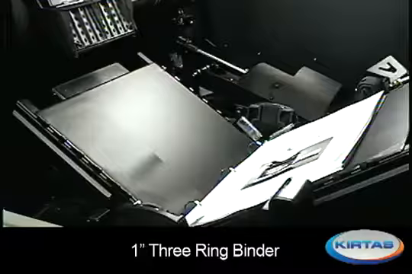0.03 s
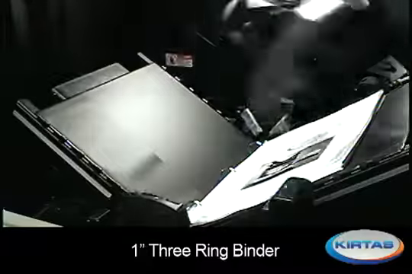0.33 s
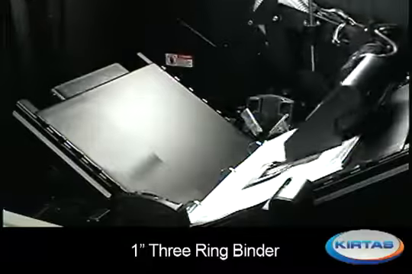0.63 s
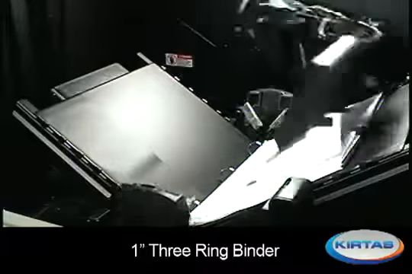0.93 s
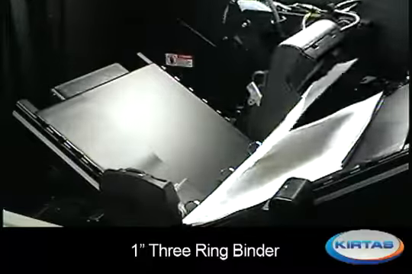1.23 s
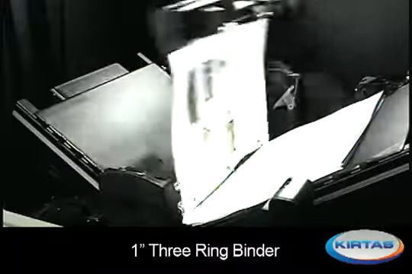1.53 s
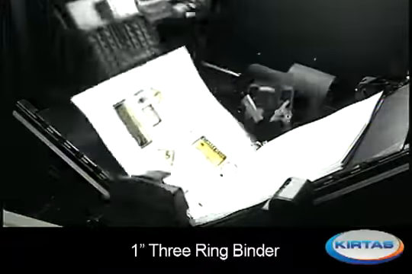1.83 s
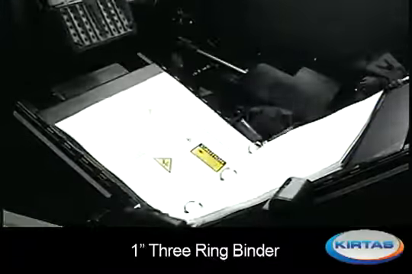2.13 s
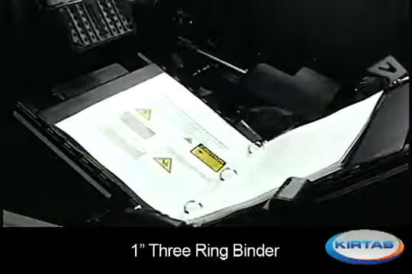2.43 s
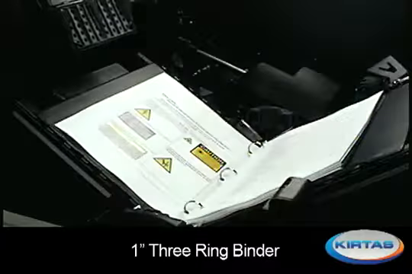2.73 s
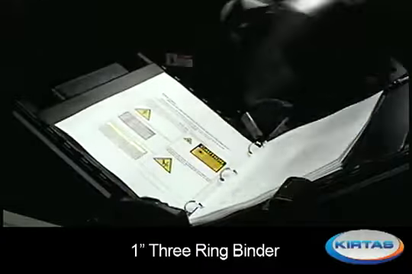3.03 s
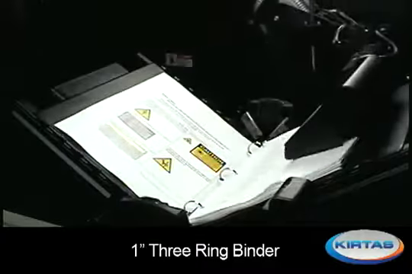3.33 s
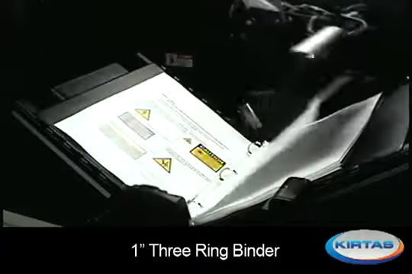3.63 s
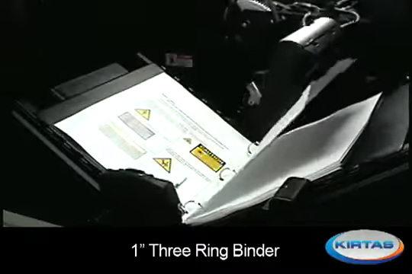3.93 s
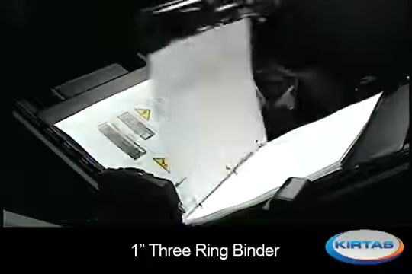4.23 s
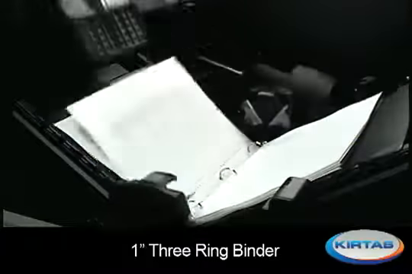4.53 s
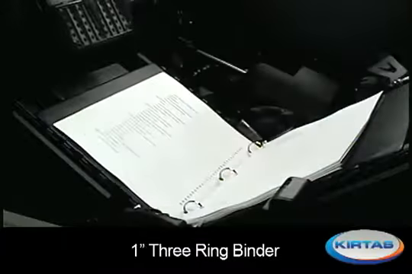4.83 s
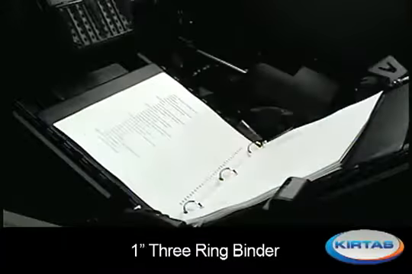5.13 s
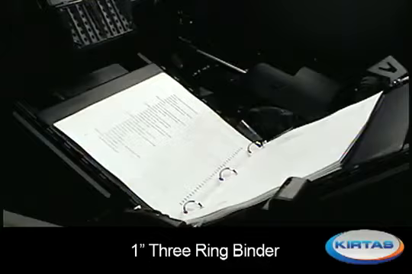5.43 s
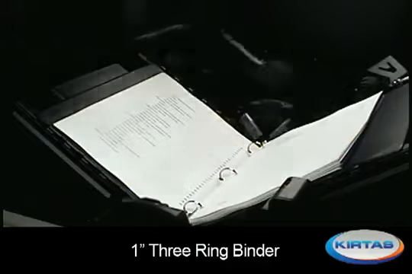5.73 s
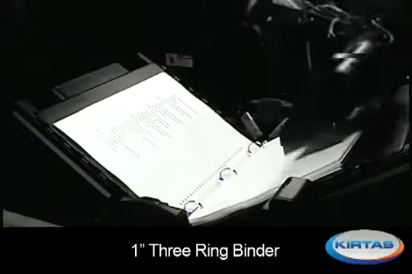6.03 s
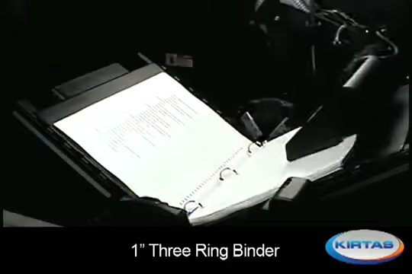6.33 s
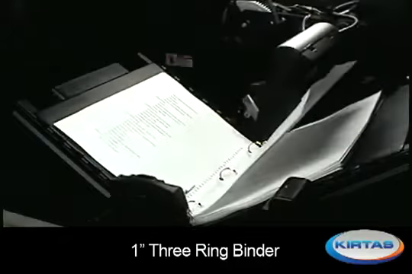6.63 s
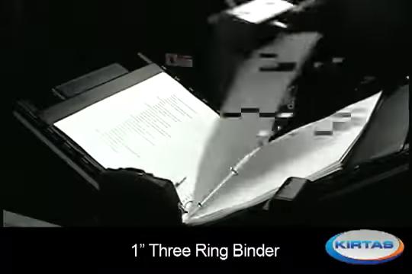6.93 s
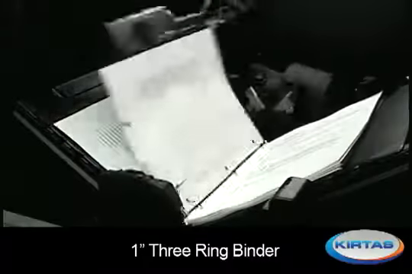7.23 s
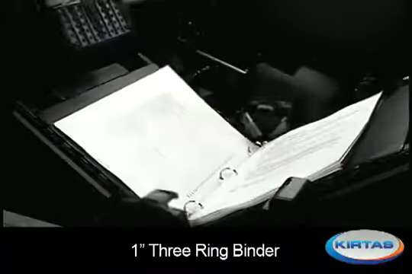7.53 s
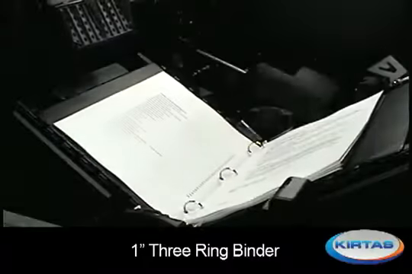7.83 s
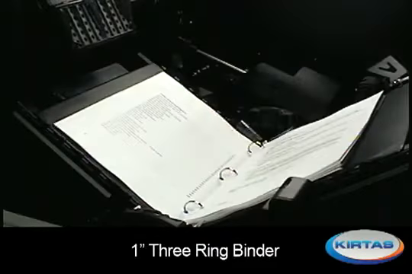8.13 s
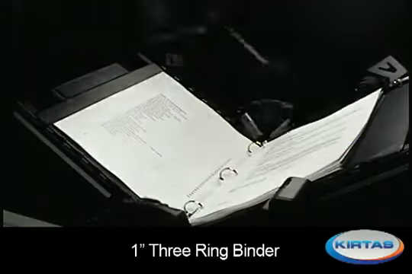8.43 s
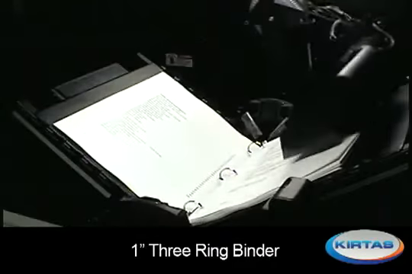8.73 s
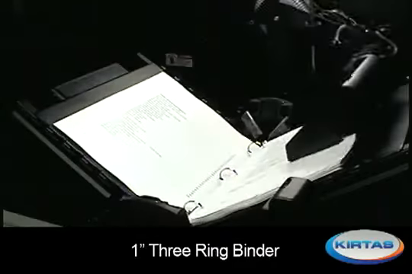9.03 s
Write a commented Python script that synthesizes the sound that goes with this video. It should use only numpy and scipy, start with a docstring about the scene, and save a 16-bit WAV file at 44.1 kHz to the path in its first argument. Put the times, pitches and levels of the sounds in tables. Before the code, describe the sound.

A book scanner turns the pages of a ring binder, heard close up inside its cabinet. Latches clack, gears whir and a motor whines as a suction arm grips a sheet with a light slap. A short rush of air follows, then a padded thump and a bright metallic snap. The cycle repeats about every three seconds, three times over, and a fourth begins. Fans hum steadily throughout.

```python
"""A whining motor, a rush of air, then a thump and a snap, over and over every 2.7 to 2.9 s.
This is a book scanner turning the pages of a ring binder inside its cabinet. A suction arm swings
in, grips a sheet and lifts it. Rushing air lays the sheet down, the page clamps land on it,
and the latches clack round again. Fans hum the whole time."""
import sys
import numpy as np
from scipy import signal
from scipy.fft import rfft, irfft
from scipy.io import wavfile
from scipy.ndimage import map_coordinates

SR = 44100
rng = np.random.default_rng(int(sys.argv[2]) if len(sys.argv) > 2 else 0)


def store_wav(level_fs):
    """Save 16-bit WAV to argv[1]."""
    pcm = np.round(np.clip(np.atleast_2d(level_fs), -1, 1) * 32767)
    wavfile.write(sys.argv[1], SR, pcm.T.astype(np.int16))


N = 400428
TIME = np.arange(N) / SR
VALVE_OPEN_S, VALVE_SHUT_S = 1.824, 2.101  # counted from the start of each page turn

# In the tables, start_s counts from the start of the sound, offset_s from the start of a page turn.
# fade_s is the time a sound takes to fall by 60 dB.
# Page turns: start_s, clamp_force_db, jolt_db
TURNS = [(0.0299, -3.5, -3.5), (2.6858, -4, -0.5), (5.5616, -4, -10.5), (8.219, -6.5, 1)]
# A catch trips between turns, with a tick and then a clack: start_s, tick_db, clack_db, rattle_s
CATCHES = [(2.39, -38, -31.5, 0.019), (5.253, -37.5, -32, 0.015), (5.562, -51, -30.5, 0.041),
           (7.901, -34.5, -33, 0.0089)]
# Pitches the air duct boosts or weakens: pitch_hz, width_hz, boost_db
DUCT_RESONANCES = [(1050, 80, 6), (1270, 170, -5), (1420, 60, 5), (1565, 80, 4), (1745, 100, 4),
                   (2350, 120, -4), (2520, 70, 3), (2770, 110, 5), (3860, 120, -3), (4430, 140, 3),
                   (5600, 400, 3)]
# Tone colour of a hard knock: pitch_hz, level_db
KNOCK_SPECTRUM = [(60, -11.5), (200, -3), (650, -4.5), (950, 4), (1700, 5), (2700, -1.5), (3600, -8.5),
                  (5500, -13.5), (7000, -11), (11000, -17), (14000, -32)]


def air_rush():
    """Swirling air hisses out of the valve while the sheet is laid down."""
    # Strength of each rush: gain_db
    strengths = [0.4, 0.65, 0.8]
    # Tone colour of the air: pitch_hz, level_db
    spectrum = [(30, -17), (70, -12), (110, -0.5), (320, -6.5), (900, 1), (1650, -0.5), (2300, 1),
                (3050, -2.5), (3500, -4), (5000, -10.5), (6500, -13), (9500, -14.5), (11300, -17.5),
                (12500, -35)]
    eddies = churned(gritty(grain_db=.8, grain_hz=900), patch_db=1.5, patch_hz=200, patch_s=.022)
    flow, one_rush = np.zeros(N), valve_flow(TIME[:N // 3])
    for (start, _, _), gain_db in zip(TURNS, strengths):
        add(flow, start, amp(gain_db) * one_rush)
    return amp(1.23) * in_cabinet(eddies * flow, spectrum, DUCT_RESONANCES, depth=.94)


def valve_flow(t, build_db_per_s=800, sag_db_per_s=10, cut_db_per_s=332, leak_db_per_s=55):
    """Stored air escapes with a puff, sags with the pressure and is cut off; a weak leak dies away."""
    since_open = t - VALVE_OPEN_S
    since_shut = np.maximum(t - VALVE_SHUT_S, 0)
    build = amp(build_db_per_s * np.minimum(since_open, 0))
    puff = 1 + .35 * np.exp(-(since_open / .007) ** 2)
    flow = amp(-25 - sag_db_per_s * np.maximum(since_open, 0) - cut_db_per_s * since_shut)
    leak = amp(-32.5 - leak_db_per_s * since_shut)
    return build * puff * np.maximum(flow, leak)


def thumps(landing_s=2.0892, swell_s=.00271):
    """The padded clamp thumps the binder's cradle, which rings; clamp and valve make the cabinet boom."""
    # How the clamp lands in each turn: level_db, pitch_hz
    hits = [(-7.6, 495), (-9.8, 520), (-8.5, 530)]
    # It bounces before it rests: start_s, level_db, pitch_hz
    bounces = [(2.1487, -20, 480), (2.1617, -20, 500), (4.787, -22, 480), (4.801, -24, 520),
               (7.6785, -17.5, 470), (7.692, -21, 500), (7.699, -23, 540)]
    # Ringing notes of the cradle: pitch_hz, gain_db, fade_s
    cradle_notes = [(269, -22.5, .3), (410, -24, .2), (505, -17.5, .22), (590, -26, .2), (630, -25, .16)]
    # Tone colour of the boom: pitch_hz, level_db
    boom_spectrum = [(30, -14), (80, -5), (130, -5), (280, -3), (370, -7), (450, 3), (530, 4), (630, 1),
                     (800, -11), (2100, -13), (5000, -29), (12000, -55)]
    out, t = np.zeros(N), np.arange(SR // 4) / SR
    landings = [(start + landing_s, db, hz) for (start, _, _), (db, hz) in zip(TURNS, hits)]
    push = (t / swell_s * np.exp(1 - t / swell_s)) ** 3
    for s, db, hz in landings + bounces:
        add(out, s, amp(db) * push * np.sin(2 * np.pi * hz * t))
    for s, db, _ in landings:
        for hz, gain_db, fade_s in cradle_notes:
            ring = amp(db + gain_db - 60 * t / fade_s) * np.sin(2 * np.pi * hz * t)
            add(out, s + 2 * swell_s, ring)
    valve_booms = each_turn([(VALVE_OPEN_S - .023, -6, .21)])  # offset_s, level_db, fade_s
    clamp_booms = [(s + .004, db, .28) for s, db, _ in landings]
    touches = [(s + swell_s / 2, db, .03) for s, db, _ in landings]
    boom = blows(clamp_booms + valve_booms, rise_s=.004, crack=.1, crack_s=.006, tail_db=-20, tail_s=.4)
    knock = blows(touches, rise_s=.0005, crack=.5, crack_s=.002, tail_db=-30, tail_s=.1)
    out += amp(-16) * in_cabinet(knock * rng.standard_normal(N), KNOCK_SPECTRUM, depth=.5)
    return out + amp(-16.5) * in_cabinet(boom * rng.standard_normal(N), boom_spectrum, depth=.4)


def metal_clicks():
    """Bright clicks: the clamps snap, the valve bursts open, the catch trips and the sheet ticks on the binder
    rings."""
    # Snaps of the clamps, and the sharp burst as the valve opens: offset_s, level_db, fade_s
    snaps = [(.009, -34.5, 0.13), (.061, -25, 0.047), (.086, -34.5, .11), (1.709, -37.5, 0.15),
             (1.821, -28, 0.062), (2.126, -35.5, 0.084), (2.165, -14.5, 0.087), (2.286, -22, 0.03)]
    # Ticks on the rings: start_s, level_db
    ring_ticks = [(.771, -37), (1.821, -33), (2.396, -28), (4.005, -38), (5.277, -29), (5.935, -30),
                  (6.368, -31), (7.271, -28)]
    # Tone colour of a click: pitch_hz, level_db
    spectrum = [(100, -20), (800, -6), (1500, -.5), (3000, -3), (4500, -3), (7200, -5.5), (9000, -2),
                (11000, -6), (13000, -6), (14500, -14)]
    # Resonances of the metal clamps: pitch_hz, width_hz, boost_db
    resonances = [(1650, 300, 2), (2750, 400, 5), (3850, 300, -6), (4350, 400, 3), (6230, 150, 5),
                  (7000, 1200, -4), (9430, 300, 8), (10100, 300, -6), (10480, 220, 6)]
    clicks = [(start + s, db + force_db, fade_s)
              for start, force_db, _ in TURNS for s, db, fade_s in snaps]
    clicks += [(s, db, .27) for s, db, _, _ in CATCHES]
    clicks += [(s, db, .019) for s, db in ring_ticks]
    loudness = blows(clicks, rise_s=.00052, crack=.24, crack_s=.0013, tail_db=-19.5, tail_s=.24)
    return in_cabinet(loudness * gritty(grain_db=1, grain_hz=900), spectrum, resonances, depth=.9)


def arm():
    """The gears get louder as the arm works harder; its motor whines, and groans as it brakes."""
    # Effort as the arm swings in, rests, lifts and carries the sheet: offset_s, level_db
    effort_curve = [(.04, -35.5), (.16, -40), (.25, -35), (.34, -35.5), (.45, -34), (.56, -37.5),
                    (.7, -40.5), (.92, -37.5), (1.06, -38.5), (1.24, -36), (1.45, -39), (1.65, -41.5),
                    (1.78, -31)]
    # Extra effort in each turn: gain_db
    turn_gains = [-0.1, -.1, 0.2, -0]
    # Motor whines of the swing and the lift: offset_s, length_s, pitch_hz, level_db
    whines = [(.16, .5, 1042, -48), (.375, .025, 1022, -40), (.33, .06, 3530, -54), (.96, .34, 1734, -48),
              (1.0, .27, 2422, -56), (1.0, .25, 655, -53), (1.0, .27, 1387, -58)]
    # Tone colour of the gears: pitch_hz, level_db
    gear_spectrum = [(60, -15.5), (200, 3.5), (600, -2.5), (1400, -2.5), (2600, -8), (3600, -11.5),
                     (4600, -14.5), (7000, -21), (10500, -19.5), (13000, -31)]
    # Tone colour of the groan: pitch_hz, level_db
    groan_spectrum = [(40, -41), (95, -12), (120, -16), (155, 3), (205, -2.5), (250, 9), (310, -23),
                      (500, -7), (1000, -14), (4000, -62)]
    gears = churned(gritty(grain_db=1.8, grain_hz=400), patch_db=2.2, patch_hz=170, patch_s=.035)
    effort = loudness_curve([[(start + s, db + gain_db) for s, db in effort_curve]
                             for (start, _, _), gain_db in zip(TURNS, turn_gains)])
    strain = amp(drift(25))
    out = amp(-1.55) * in_cabinet(gears * effort * strain, gear_spectrum, DUCT_RESONANCES, depth=.16)
    for s, length_s, hz, db in whines:
        runs = [[(start + s, db), (start + s + length_s, db)] for start, _, _ in TURNS]
        out += loudness_curve(runs) * tone(hz, wander_hz=3, flutter_db=1.3)
    braking = amp(-36.5) * swell_each_turn(offset_s=.437, length_s=.25)
    return out + in_cabinet(braking * rng.standard_normal(N), groan_spectrum, depth=.65)


def latches(rise_s=.0012, tail_db=-12, tail_s=.68):
    """Each latch strikes, rings and chatters; an electromagnet rattles as the arm grips the sheet."""
    # Clacks of the latches: offset_s, level_db, rattle_s
    turn_clacks = [(0.058, -30, 0.032), (0.083, -36.5, 0.012), (0.845, -31, 0.025), (1.718, -40, 0.02),
                   (1.784, -35, 0.032), (2.233, -33.5, 0.024)]
    # Resonances that colour the chatter: pitch_hz, width_hz, boost_db
    resonances = [(880, 70, 5), (1080, 160, 4), (1340, 70, 4), (1720, 90, 4), (2100, 160, 4), (2690, 70, 6),
                  (2880, 70, 4), (4720, 180, 5), (6050, 250, 6)]
    # Ringing notes of a latch: pitch_hz, gain_db, fade_s
    latch_notes = [(875, -6, .11), (1085, -5, .1), (1205, -7, .14), (1340, -3, .15), (1725, -6, .17),
                   (2160, -9, .1), (2870, -12, .16), (4700, -17, .13)]
    # Strikes of the electromagnet: offset_s, level_db
    grips = [(.845, -33.5), (.868, -38)]
    # Its ringing notes: pitch_hz, gain_db, fade_s
    grip_notes = [(965, 3, .13), (1080, -2, .1), (1410, -3, .09), (1800, -3, .06), (2090, -3, .16),
                  (2685, -3, .18), (3090, -9, .14), (3480, -7, .14), (4750, -9, .1), (5200, -10, .1)]
    loudness, t = np.zeros(N), np.arange(SR // 2) / SR
    # Only the earliest clacks of a turn share its starting jolt.
    clacks = [(start + s, db + jolt_db * (s < .12), rattle_s)
              for start, _, jolt_db in TURNS for s, db, rattle_s in turn_clacks]
    clacks += [(s + .02, db, rattle_s) for s, _, db, rattle_s in CATCHES]
    attack = 1 - np.exp(-t / rise_s)
    tail = amp(tail_db - 60 * t / tail_s)
    for s, db, rattle_s in clacks:
        chatter = np.exp(-(t / rattle_s) ** 3)
        add(loudness, s, amp(db) * attack * np.hypot(chatter, tail))
    grit = gritty(grain_db=2.2, grain_hz=600)
    rattle = amp(2.5) * in_cabinet(loudness * grit, KNOCK_SPECTRUM, resonances, depth=1.2)
    strikes = [(s, db - 6) for s, db, _ in clacks]
    return rattle + struck(strikes, latch_notes) + struck(each_turn(grips), grip_notes)


def paper_slaps():
    """The sheet slaps against the ringing suction head and rustles under the arm."""
    # The head lands on the sheet, settles and lets go: offset_s, level_db, fade_s
    slaps = [(.467, -23.5, 0.13), (.482, -31, 0.092), (2.041, -18, 0.091)]
    # Rustles of the loose sheet: start_s, level_db
    rustles = [(.2254, -35), (.3724, -34), (0.769, -29), (3.0874, -32), (3.4507, -29), (5.937, -31),
               (6.373, -31.5), (8.607, -34), (8.975, -31)]
    # Tone colour of the paper: pitch_hz, level_db
    spectrum = [(100, -11), (900, 5), (1600, -1.5), (3200, -2), (5200, -3.5), (7500, -7), (11000, -7.5),
                (13500, -32)]
    # Resonances of the suction head: pitch_hz, width_hz, boost_db
    resonances = [(1410, 100, 11), (2110, 90, 5), (2850, 120, 11), (3150, 120, 8), (4330, 110, 5),
                  (4870, 140, 6), (5320, 200, 7), (6430, 160, 4), (7150, 160, 8)]
    touches = each_turn(slaps) + [(s, db, .16) for s, db in rustles]
    loudness = blows(touches, rise_s=.0015, crack=.4, crack_s=.01, tail_db=-35, tail_s=.25)
    crackle = loudness * gritty(grain_db=2, grain_hz=700)
    return amp(-4) * in_cabinet(crackle, spectrum, resonances, depth=1.3)


def paper_pops():
    """The sheet buckles with dull, crackly pops as the air bends it over."""
    # Pops: start_s, level_db, fade_s
    pops = [(1.903, -21, 0.075), (2.072, -25, 0.067), (4.622, -35, 0.07), (7.602, -32, .07)]
    # Their tone colour: pitch_hz, level_db
    spectrum = [(100, -5), (600, -3), (1000, -7), (1700, -2), (2800, -14), (4500, -15), (11000, -22),
                (13000, -38)]
    loudness = blows(pops, rise_s=.002, crack=.3, crack_s=.01, tail_db=-30, tail_s=.2)
    return in_cabinet(loudness * gritty(grain_db=2, grain_hz=700), spectrum, DUCT_RESONANCES, depth=.8)


def paper_squeaks(wander_hz=60):
    """The sheet slips with brief, rough tones as it is gripped, slides and is let go."""
    # Slips: start_s, level_db, pitch_hz, glide_hz_per_s, length_s
    slips = [(.48, -42, 2820, 0, .073), (1.924, -29, 2800, -7000, .02), (1.975, -29.5, 1580, 0, .04),
             (3.138, -44, 2820, 0, .098), (4.622, -26, 1520, 10000, .028), (4.727, -29, 3980, -1000, .027),
             (6.011, -39, 2820, 0, .073), (7.605, -28.5, 4050, -2500, .036), (7.607, -26, 1800, 0, .016),
             (8.667, -45, 2820, 0, .081)]
    out, wobble, roughness = np.zeros(N), drift(60), evened(1 + drift(250))
    for s, db, hz, glide, length_s in slips:
        part = slice(round(s * SR), round((s + 2 * length_s) * SR))
        pitch_hz = hz + glide * (TIME[part] - s) + wander_hz * wobble[part]
        loudness = amp(db) * np.sqrt(2) * swell(s, length_s)[part] * roughness[part]
        add(out, s, loudness * sine(pitch_hz))
    return out


def frame_shudders():
    """The frame shakes briefly as the arm starts and stops, the valve opens and the clamps close."""
    # The jolt as the arm starts: offset_s, level_db, pitch_hz, length_s
    first_jolt = (.052, -33.5, 160, .1)
    # The later shudders: offset_s, level_db, pitch_hz, length_s
    shudders = [(.48, -39.5, 120.5, .13), (.5, -41, 204, .14), (.835, -39, 160, .055),
                (1.715, -38, 450, .04), (1.785, -35, 490, .04), (1.805, -33, 120.5, .06),
                (2.065, -37, 160, .07), (2.15, -39.5, 150, .13)]
    s, db, hz, length_s = first_jolt
    jolts = sum(amp(db + jolt_db) * swell(start + s, length_s) for start, _, jolt_db in TURNS)
    shakes = [(jolts, hz)]
    shakes += [(amp(db) * swell_each_turn(s, length_s), hz) for s, db, hz, length_s in shudders]
    return sum(gain * tone(hz, wander_hz=6, flutter_db=2) for gain, hz in shakes)


def fans():
    """The fans blow a steady wash of air, and their blades hum."""
    # Tone colour of the wash: pitch_hz, level_db
    spectrum = [(25, -43), (60, -15), (90, -20), (125, -5.5), (180, -2), (245, -6.5), (310, -2.5),
                (500, -0.6), (630, -2.7), (750, 0), (1000, -2), (1300, -8), (2500, -11), (4500, -15.5),
                (9500, -19), (12000, -19.5), (13500, -29)]
    # A faint high resonance: pitch_hz, width_hz, boost_db
    resonances = [(3963, 45, 2)]
    # Hums of the blades: pitch_hz, level_db, wander_hz, flutter_db
    hums = [(443, -51.5, 13, 3), (802, -53.5, 2, 2), (871.5, -44.8, 2.5, 1.4), (930, -58, 4, 2),
            (1042.5, -44.7, 3.2, 1.4)]
    wash = amp(-35.5) * in_cabinet(gritty(grain_db=.5, grain_hz=57.7), spectrum, resonances, depth=1.76)
    return wash + sum(amp(db) * tone(hz, wander, flutter) for hz, db, wander, flutter in hums)


def stereo_spread(x, decay_s=.0093, size=1024):
    """A short, bright smear that slightly widens the sound when it is opposite in each channel."""
    # Tone colour of the smear: pitch_hz, level_db
    spectrum = [(100, -13.5), (500, -26), (1500, -13), (4000, -3), (8000, -8), (13000, -31)]
    colour = amp(spectrum_db(spectrum, size))
    burst = irfft(rfft(rng.standard_normal(size)) * colour, size)
    fade = np.exp(-np.arange(size) / SR / decay_s)
    return signal.oaconvolve(x, burst * fade / np.linalg.norm(fade))[:N]


def in_cabinet(x, spectrum, resonances=(), depth=1., size=8192):
    """Gives noise a tone colour, plus its own and the cabinet's resonances, scaled by depth."""
    # Pitches the cabinet boosts: pitch_hz, width_hz, boost_db
    cabinet = [(121, 20, 7), (161, 16, 6), (200, 20, 6), (235, 14, 4), (273, 18, 5), (350, 40, 3),
               (446, 46, 8), (490, 16, 3), (532, 24, 4), (585, 26, 4), (655, 18, 4), (695, 22, 4)]
    hz = np.fft.rfftfreq(size, 1 / SR)
    peaks_db = sum(boost / (1 + (2 * (hz - centre) / width) ** 2)
                   for centre, width, boost in [*cabinet, *resonances])
    db = spectrum_db(spectrum, size) + depth * peaks_db
    log_gain = np.log(amp(np.r_[db, db[-2:0:-1]]))
    # This filter rings after a hit, never before it.
    response = np.fft.ifft(np.exp(np.conj(signal.hilbert(log_gain)))).real[:size // 2]
    return signal.oaconvolve(x, response / np.linalg.norm(response))[:N]


def spectrum_db(spectrum, size):
    """Joins (pitch_hz, level_db) points into a curve over all pitches."""
    hz, db = np.transpose(spectrum)
    return np.interp(np.log(np.fft.rfftfreq(size, 1 / SR) + 1), np.log(hz), db)


def struck(strikes, notes, vary_db=1.5, detune=.003):
    """Sharp strikes set a metal part ringing, a little differently each time."""
    out, t = np.zeros(N), np.arange(SR // 5) / SR
    hz, gain_db, fade_s = np.transpose(notes)[:, :, None]
    for s, db in strikes:
        strength, mistuning, side = rng.standard_normal((3, len(notes), 1))
        loudness = amp(db + gain_db + vary_db * strength - 60 * t / fade_s)
        waves = np.sign(side) * np.sin(2 * np.pi * hz * (1 + detune * mistuning) * t)
        add(out, s, (loudness * waves).sum(0))
    return out


def blows(hits, rise_s, crack, crack_s, tail_db, tail_s):
    """Loudness of hits over time: a first crack, chatter dying away, and the cabinet's faint tail."""
    power, t = np.zeros(N), np.arange(SR // 2) / SR
    attack = 1 - np.exp(-t / rise_s)
    tail = amp(tail_db - 60 * t / tail_s)
    for s, db, fade_s in hits:
        shape = crack * np.exp(-t / crack_s) + amp(-60 * t / fade_s) + tail
        add(power, s, (amp(db) * shape * attack) ** 2)
    return np.sqrt(power)


def gritty(grain_db, grain_hz):
    """Noise that comes in clumps, as from many tiny contacts."""
    return evened(rng.standard_normal(N) * amp(grain_db * drift(grain_hz)))


def churned(x, patch_db, patch_hz, patch_s, size=512):
    """Bands of pitch swell and sink as contacts and swirls of air come and go."""
    hz, t, slices = signal.stft(x, SR, nperseg=size, noverlap=size * 3 // 4)
    field = rng.standard_normal((400, 1500))
    grid = np.meshgrid(hz / patch_hz, t / patch_s, indexing="ij")
    patches = evened(map_coordinates(field, grid, order=1, mode="mirror"))
    slices = slices * evened(amp(patch_db * patches))
    return signal.istft(slices, SR, nperseg=size, noverlap=size * 3 // 4)[1][:N]


def tone(hz, wander_hz, flutter_db):
    """A note that wavers in pitch and loudness."""
    return evened(sine(hz + wander_hz * drift(60)) * amp(flutter_db * drift(25)))


def sine(pitch_hz):
    """A pure wave that follows a changing pitch."""
    return np.sin(2 * np.pi * np.cumsum(pitch_hz) / SR)


def drift(rate_hz):
    """A random wobble, about 1 in size."""
    points = rng.standard_normal(20000)
    return evened(np.interp(TIME * rate_hz, np.arange(len(points)), points))


def loudness_curve(curves, edge_s=.04):
    """Follows lists of (start_s, level_db) points, fading to silence between the lists."""
    gain = np.zeros(N)
    for points in curves:
        s, db = np.transpose(points)
        gate = np.interp(TIME, [s[0] - edge_s, s[0], s[-1], s[-1] + edge_s], [0, 1, 1, 0])
        gain += gate * amp(np.interp(TIME, s, db))
    return gain


def swell(start_s, length_s):
    """A quick rise and a slower fall, silent before and after."""
    return np.interp((TIME - start_s) / length_s, [0, .25, .5, 1.2], [0, 1, .8, 0])


def swell_each_turn(offset_s, length_s):
    """The same swell at the same moment of every page turn."""
    return sum(swell(start + offset_s, length_s) for start, _, _ in TURNS)


def each_turn(rows):
    """Repeats rows for every page turn, changing offset_s into start_s."""
    return [(start + s, *rest) for start, _, _ in TURNS for s, *rest in rows]


def amp(db):
    """Turns decibels into a plain multiplier."""
    return 10 ** (np.asarray(db) / 20)


def evened(x):
    """Scales a signal to an average power of 1."""
    return x / np.sqrt(np.mean(x ** 2) + 1e-20)


def add(mix, start_s, sound):
    """Mixes a sound in at the given time."""
    part = mix[max(round(start_s * SR), 0):][:len(sound)]
    part += sound[:len(part)]


def scene(lag_s=3.45e-5):
    """Two close microphones: the left hears the machine a moment later; a smear widens the sound."""
    machine = (fans() + arm() + air_rush() + paper_pops() + paper_squeaks() + latches()
               + metal_clicks() + paper_slaps() + thumps() + frame_shudders())
    delay = np.exp(-2j * np.pi * np.fft.rfftfreq(N, 1 / SR) * lag_s)
    left = irfft(rfft(machine) * delay, N)
    spread = amp(-4) * stereo_spread(machine)
    return np.array([left + spread, machine - spread])


def record(dry):
    """The sound cuts in after a moment of silence, and the very highest treble is removed."""
    silence_s, top_hz = .084, 14200
    fade_in = np.clip((TIME - silence_s) * 500, 0, 1)
    treble_cut = signal.firwin(255, top_hz, window=("kaiser", 9), fs=SR)
    return signal.oaconvolve(dry * fade_in, treble_cut[None], "same")


dry = scene()
out = record(dry)
store_wav(out)
```